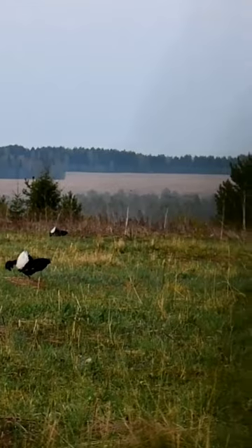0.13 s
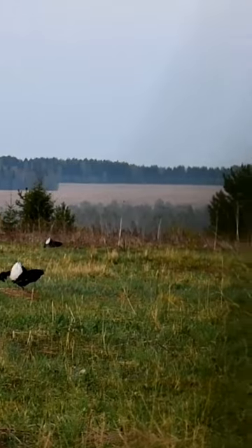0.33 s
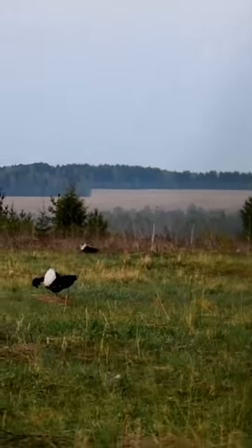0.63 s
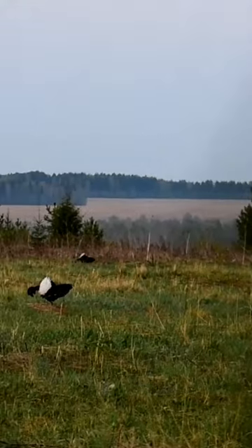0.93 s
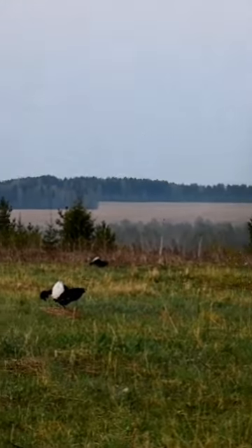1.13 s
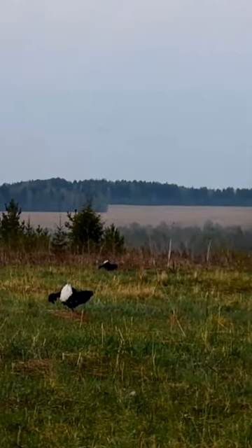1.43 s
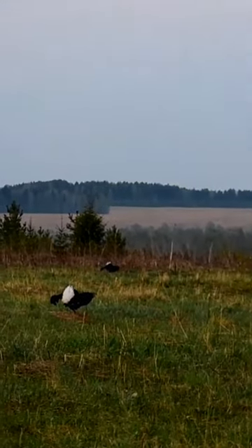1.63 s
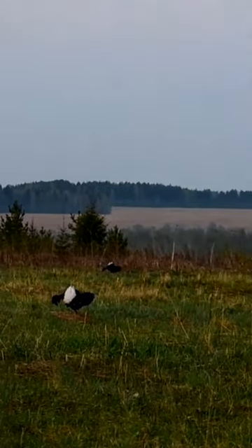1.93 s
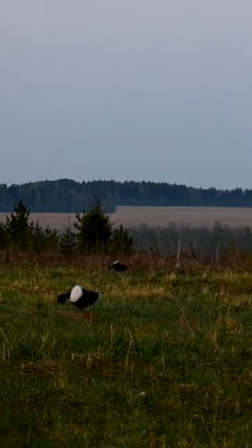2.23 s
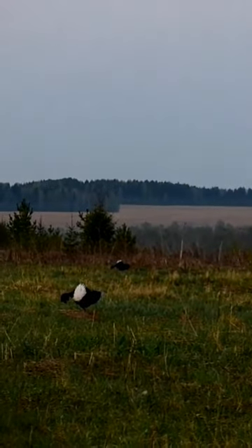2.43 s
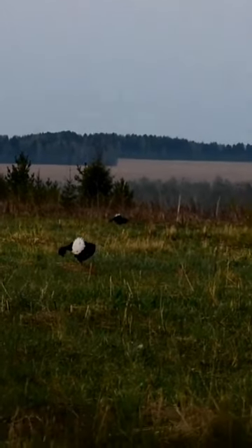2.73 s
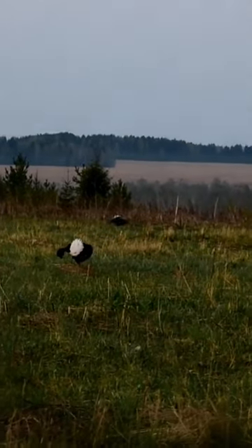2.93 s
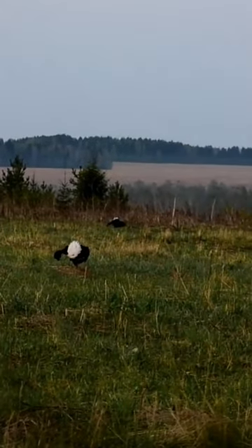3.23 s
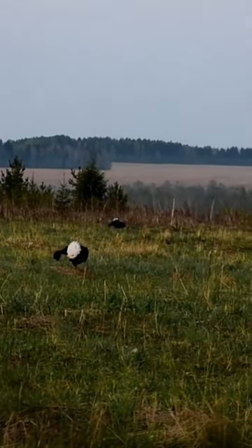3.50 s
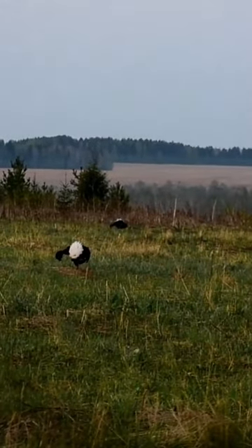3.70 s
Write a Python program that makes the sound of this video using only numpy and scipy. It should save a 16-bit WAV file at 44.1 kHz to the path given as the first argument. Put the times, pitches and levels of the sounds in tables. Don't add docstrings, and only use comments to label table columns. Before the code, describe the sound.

Bubbling black grouse calls across a field, ending in a raspy hiss, with larks whistling

```python
import sys
import numpy as np
from scipy import signal
from scipy.io import wavfile

SR = 44100
rng = np.random.default_rng(int(sys.argv[2]) if len(sys.argv) > 2 else 0)


def unload_audio(sound):
    columns = np.transpose(np.atleast_2d(sound))
    steps = np.round(np.clip(columns, -1, 1) * 32767)
    wavfile.write(sys.argv[1], SR, steps.astype(np.int16))


def boost(x):
    u = np.asarray(x, float) / 20
    return 10 ** u


N = 170226
T = np.arange(N) / SR


def rms_one(x):
    return x / np.sqrt(np.mean(x ** 2) + 1e-20)


def band_pass(x, order, low_hz, high_hz):
    return signal.sosfilt(signal.butter(order, [low_hz, high_hz], "band", fs=SR, output="sos"), x)


def coloured(x, points):
    hz, db = np.transpose(points)
    edges = np.minimum(20 * 2 ** np.arange(0, 10.1, .5), 17000)
    total = np.zeros(len(x))
    for k, (low, high) in enumerate(zip(edges, edges[1:])):
        gain = boost(np.interp(np.log(low * high) / 2, np.log(hz), db))
        total += gain * (-1) ** k * band_pass(x, 2, low, high)
    return rms_one(total)


def resonance(x, hz, width_hz):
    r = np.exp(-np.pi * width_hz / SR)
    poles = [1, -2 * r * np.cos(2 * np.pi * hz / SR), r * r]
    return signal.lfilter([(1 - r * r) / 2, 0, (r * r - 1) / 2], poles, x)


def resonance_twice(x, hz, width_hz):
    return resonance(resonance(x, hz, width_hz), hz, width_hz)


def drift(rate_hz):
    r = np.exp(-2 * np.pi * rate_hz / SR)
    slow = signal.lfilter([1], [1, -2 * r, r * r], rng.standard_normal(N + SR))
    return rms_one(slow[SR:])


def tone(pitch):
    return np.sin(2 * np.pi * np.cumsum(pitch) / SR + rng.uniform(0, 2 * np.pi))


def add_note(out, start_s, pitch, level_db, flat):
    i = int(start_s * SR)
    envelope = np.sin(np.linspace(0, np.pi, len(pitch))) ** (2 * flat)
    note = envelope * tone(pitch)
    out[i:i + len(pitch)] += boost(level_db) * note[:len(out) - i]


# f/Hz, density/dB
AIR_COLOUR = [(25, -11.5), (70, -3), (300, 0.5), (1000, -4.5), (3000, -5.5), (7000, -15), (12000, -18),
              (15500, -27)]
AIR_DB = -58


def air():
    return boost(AIR_DB + 1.06 * drift(0.82)) * coloured(rng.standard_normal(N), AIR_COLOUR)


# t/s, level/dB
HANDLING = [(.13, -55), (.7, -58), (1.3, -55), (1.7, -48.5), (1.88, -51.5), (1.96, -64), (2.5, -65),
            (2.62, -56.5), (2.8, -60.5), (2.95, -53.5), (3.1, -79)]
# f/Hz, density/dB
FABRIC_COLOUR = [(410, -61), (700, 6), (1210, -3), (2490, -5), (3300, 4), (5360, -6), (9600, -11.5),
                 (15500, -15)]
GRAINS_PER_S, GRAIN_SPREAD_DB, SMOOTH_SHARE = 1800, 4, 1.1
SHELL_HZ, SHELL_WIDTH_HZ = 3300, 500


def rustle():
    level_db = np.interp(T, *np.transpose(HANDLING))
    sizes = boost(GRAIN_SPREAD_DB * np.minimum(rng.exponential(1, N), 4)) * rng.choice([-1, 1], N)
    grains = sizes * (rng.random(N) < GRAINS_PER_S * boost(4 * drift(25)) / SR)
    dealt = rng.integers(0, 10, N)
    rings = np.zeros(N)
    for k, hz in enumerate(np.geomspace(1200, 11000, 10)):
        rings += resonance(grains * (dealt == k) + 1e-18, hz, .3 * hz)
    rub = rms_one(rings) + SMOOTH_SHARE * resonance(rng.standard_normal(N), 3400, 6400)
    on_shell = rub + 1.3 * resonance(rub, SHELL_HZ, SHELL_WIDTH_HZ)
    return boost(level_db) * coloured(on_shell, FABRIC_COLOUR)


# start t/s, length/s, from f/Hz, to f/Hz, peak level/dB
LARK_GLIDES = [(0.166, 0.036, 2120, 3080, -49), (0.404, 0.046, 4000, 3900, -42),
               (0.46, 0.037, 4500, 2605, -43), (0.566, 0.037, 6780, 6700, -48),
               (0.602, 0.036, 7180, 6280, -45.5), (0.613, 0.042, 6790, 6580, -44.5),
               (0.124, 0.031, 6000, 4940, -53.5), (0.57, 0.032, 4650, 4940, -52.5),
               (1.976, .065, 3050, 4230, -60), (2.168, 0.044, 3700, 3170, -55),
               (2.244, .16, 4000, 3140, -59), (2.422, 0.068, 4200, 3220, -60),
               (2.888, .05, 3700, 4140, -52), (2.946, .05, 4030, 3350, -52),
               (1.04, 0.024, 2790, 3270, -56.5), (2.993, 0.042, 3500, 2800, -51.5),
               (3.036, 0.049, 3070, 2570, -43.5), (3.095, 0.051, 2640, 2516, -45.5),
               (3.164, 0.084, 2457, 2442, -45), (3.292, 0.024, 2850, 2987, -50),
               (3.512, 0.027, 3410, 3380, -48), (3.722, 0.022, 7200, 4700, -54),
               (3.738, 0.018, 4800, 3810, -44.5)]
# start t/s, length/s, top f/Hz, place of top (0-1), peak level/dB
LARK_ARCHES = [
    (3.392, .073, 7050, .4, -55),
    (3.488, .067, 6750, .55, -55),
    (3.587, .069, 6900, .36, -55),
    (1.14, .1, 5600, .2, -60),
    (2.425, .04, 5300, .3, -58),
]
ARCH_RISE, ARCH_FALL, ARCH_LOW_GAIN_DB = .28, .42, 20
# start t/s, length/s, peak level/dB
LARK_TRILLS = [
    (0.269, 0.15, -56),
    (0.555, 0.18, -58),
    (0.919, 0.14, -57.5),
    (1.284, 0.13, -58),
    (1.639, 0.15, -60),
]
TRILL_HZ, TRILL_END_HZ, TRILL_WOBBLE_HZ, TRILL_PER_S = 5850, 4000, 200, 60
BUZZ_S, BUZZ_STEP_S, BUZZ_HZ, BUZZ_FALL_HZ, BUZZ_DB = 3.667, .0145, 6730, 588, -49.5
PHRASE_S, PHRASE_STEP_S = 2.022, .1205
PHRASE_HIGH_HZ, PHRASE_HIGH_DB, PHRASE_NOTE_HZ, PHRASE_NOTE_DB = 5900, -58.5, 4620, -55.5
CHORUS_HZ, CHORUS_SWING, CHORUS_DB = 4000, .16, -68


def lark_glides(out):
    waver_hz = 25 * drift(60)
    for s, length, from_hz, to_hz, db in LARK_GLIDES:
        n = int(length * SR)
        add_note(out, s, np.geomspace(from_hz, to_hz, n) + waver_hz[int(s * SR):][:n], db, flat=0.19)


def lark_arches(out):
    for s, length, top_hz, top_at, db in LARK_ARCHES:
        u = np.linspace(0, 1, int(length * SR)) - top_at
        rise = ARCH_RISE * (u / top_at) ** 2
        fall = ARCH_FALL * np.abs(u / (1 - top_at)) ** 1.5
        drop = np.where(u < 0, rise, fall)
        arch = np.zeros(N)
        add_note(arch, s, top_hz * (1 - drop), db, flat=0.035)
        drop_then = np.interp(T, s + np.linspace(0, length, len(drop)), drop)
        out += arch * boost(ARCH_LOW_GAIN_DB * drop_then - 2)


def lark_repeats(out):
    buzz_hz = BUZZ_HZ - np.linspace(0, BUZZ_FALL_HZ, int(0.0112 * SR))
    for k in range(4):
        add_note(out, BUZZ_S + k * BUZZ_STEP_S, buzz_hz, BUZZ_DB, flat=0.55)
    u = np.linspace(-1, 1, int(0.0288 * SR))
    for k in range(8):
        s = PHRASE_S + k * PHRASE_STEP_S
        sweep_hz = PHRASE_HIGH_HZ - 500 * u + 250 * drift(280)[:len(u)]
        add_note(out, s - .01, sweep_hz, PHRASE_HIGH_DB + rng.normal(0, 0.99), flat=0.4)
        add_note(out, s + 0.0095, PHRASE_NOTE_HZ - 70 * u, PHRASE_NOTE_DB + rng.normal(0, 1.5), flat=0.4)


def lark_trills(out):
    for s, length, db in LARK_TRILLS:
        u = np.linspace(0, 1, int(length * SR))
        fall_hz = (TRILL_HZ - TRILL_END_HZ) * np.clip((u - .6) / 0.34, 0, 1)
        wobble = np.sin(2 * np.pi * TRILL_PER_S * u * length) + 0.6 * drift(95)[:len(u)]
        add_note(out, s, TRILL_HZ - fall_hz + TRILL_WOBBLE_HZ * wobble, db, flat=0.052)


def lark_chorus(out):
    for bird in range(3):
        pitch = CHORUS_HZ * np.exp(CHORUS_SWING * drift(5.3))
        level_db = CHORUS_DB + 5 * np.clip(drift(9), -3, 1.2) + 4 * drift(200) - 4 * (T > 3)
        out += boost(level_db) * np.sin(2 * np.pi * np.cumsum(pitch) / SR)


def larks():
    out = np.zeros(N)
    for voice in (lark_glides, lark_arches, lark_repeats, lark_trills, lark_chorus):
        voice(out)
    echoes = sum(boost(db) * np.interp(T - lag_s, T, out)
                 for lag_s, db in ((.007, -16.5), (.019, -15), (.034, -17)))
    return (out + echoes) * boost(2.64 * drift(73))


# t/s, peak level/dB, ring f/Hz
SHELL_TICKS = [(.1628, -36.5, 2560), (.2331, -47, 9930), (0.2564, -42, 10200), (.2695, -40.5, 3400),
               (.29, -40, 12300), (.3214, -47, 10700), (.485, -41, 4500), (0.5147, -35.5, 3200),
               (.5519, -37, 3390), (0.6313, -38, 3800), (0.7661, -38.5, 3400), (1.187, -36, 3800),
               (1.37, -37, 3240), (1.3925, -41.5, 8300), (1.5315, -32.5, 3170), (1.55, -40.5, 1390),
               (1.5945, -37, 5500), (1.62, -33, 5100), (1.6599, -35, 4800), (1.7911, -43, 9200),
               (1.8097, -32, 3200), (1.8644, -47, 9580), (2.1089, -42.5, 3680), (2.297, -43, 9600),
               (2.5394, -41.5, 3600), (2.5717, -35, 3430), (3.786, -30.5, 1700)]
TICK_WIDTH_SHARE = 0.26


def ticks():
    out, n = np.zeros(N), int(.01 * SR)
    for s, db, hz in SHELL_TICKS:
        slip = rng.uniform(-1, 1, n) * np.exp(-np.arange(n) / SR / .0007)
        width_hz = TICK_WIDTH_SHARE * hz
        ring = resonance(resonance(slip, hz, width_hz), hz, 2 * width_hz)
        i = int(s * SR)
        out[i:i + n] += boost(db) * ring / np.abs(ring).max()
    return out


# note centre t/s, peak level/dB
ROLL_NOTES = [(.21, -47.5), (0.285, -50.5), (.358, -50), (0.435, -47), (.504, -48.5), (.58, -48),
              (.651, -47), (0.721, -49), (1.029, -47), (1.089, -52.5), (1.165, -55), (1.239, -49),
              (1.31, -50), (1.382, -48.5), (1.455, -49), (1.529, -47.5), (1.603, -45.5), (1.674, -50),
              (1.748, -46), (1.817, -43.5), (1.904, -42), (1.986, -42.5), (2.046, -44), (2.111, -51.5)]
ROLL_HZ, ROLL_RISE_FROM_S, ROLL_RISE_HZ_PER_S = 395.5, 1.34, 71
ROLL_NOTE_S, ROLL_FALL_HZ_PER_S, STEEPER_PER_HZ = 0.063, 3170, 29.5
# note centre t/s, f/Hz, glide/(Hz/s), peak level/dB
BUBBLE_NOTES = [(2.39, 508, -800, -41), (2.485, 470, -6500, -45.5), (2.567, 449, -4500, -45),
                (2.615, 467, -1500, -42), (2.653, 405, -300, -43), (2.692, 438, -4500, -43),
                (2.732, 407, -1500, -42.5), (2.77, 396.5, -4500, -48), (2.867, 440, -3000, -36.5),
                (2.968, 517, -1500, -46), (2.997, 514, -300, -45), (3.026, 424, -6500, -45),
                (3.052, 489, 300, -44.5), (3.088, 470, -3000, -48), (3.155, 540, -5500, -42.5),
                (3.224, 546, 1502, -45), (3.265, 484, -4500, -42), (3.306, 415, 1500, -45),
                (3.346, 433, -1500, -45.5), (3.411, 448, -3000, -40), (3.655, 444, -6500, -46),
                (3.79, 520, -1500, -52), (3.83, 519, 300, -50.5)]
# note centre t/s, f/Hz, peak level/dB
FAR_COOS = [(.47, 508, -53), (.585, 521, -51), (.66, 503, -54), (.76, 550, -55), (.85, 536, -58.5),
            (1.04, 510, -58), (1.085, 522, -56), (1.12, 509, -51), (1.262, 541, -46), (1.33, 523, -49.5),
            (1.45, 518, -58), (1.79, 555, -49), (2.345, 508, -58.5), (3.195, 484, -50.5),
            (3.61, 503.4, -59), (3.645, 535, -54)]
BUBBLE_NOTE_S, FAR_NOTE_S = 0.049, 0.033
LEK_DB, LEK_HZ, LEK_WIDTH_HZ = -66.5, 470, 102
ECHO_S, ECHO_DB = .031, -14.5


def grouse():
    roll = []
    for s, db in ROLL_NOTES:
        up_hz = ROLL_RISE_HZ_PER_S * max(s - ROLL_RISE_FROM_S, 0)
        roll.append((s, ROLL_HZ + up_hz, -ROLL_FALL_HZ_PER_S - STEEPER_PER_HZ * up_hz, db))
    far = [(s, hz, -600, db) for s, hz, db in FAR_COOS]
    out = np.zeros(N)
    for notes, length in ((roll, ROLL_NOTE_S), (BUBBLE_NOTES, BUBBLE_NOTE_S), (far, FAR_NOTE_S)):
        from_centre_s = np.arange(int(length * SR)) / SR - length / 2
        for s, hz, glide, db in notes:
            add_note(out, s - length / 2, hz + glide * from_centre_s, db, flat=1.0)
    out += boost(ECHO_DB) * np.interp(T - ECHO_S, T, out)
    lek = rms_one(resonance_twice(rng.standard_normal(N), LEK_HZ, LEK_WIDTH_HZ))
    return out * boost(2.3 * drift(36)) + boost(LEK_DB + 0.95 * drift(8)) * lek


# t/s, peak level/dB, ring f/Hz, scratch level/dB
SHELL_CREAKS = [(0.187, -32, 3280, -53), (0.2054, -28.5, 3280, -42.5), (0.3008, -44, 5300, -46.5),
                (0.5825, -41, 6800, -43.5), (0.8525, -30, 6000, -42), (0.8992, -38, 3640, -39.5),
                (0.9762, -26, 3270, -62), (1.1407, -30.5, 3400, -38.5), (1.3819, -32.5, 3320, -43.5),
                (1.489, -31.5, 3600, -81), (1.6387, -37, 3450, -65), (1.736, -32.5, 3820, -29),
                (1.9308, -25, 4070, -36), (2.0752, -37.5, 3870, -67), (2.1483, -34, 3400, -71),
                (2.2734, -37.5, 3840, -55), (2.412, -39.5, 4240, -43), (2.6203, -37.5, 3540, -37),
                (2.6948, -29.5, 3480, -37.5), (2.828, -37, 3300, -47), (2.8583, -33, 2800, -42)]
SLIPS_PER_S, CREAK_S, CREAK_WIDTH_HZ, LONG_RUB_S, LONG_RUB_AT_S = 5600, 0.0024, 1550, 0.0058, 1.736


def creaks():
    out, n = np.zeros(N + SR), int(.04 * SR)
    for s, db, hz, bright_db in SHELL_CREAKS:
        chance, size = rng.random((2, n))
        length = LONG_RUB_S if abs(s - LONG_RUB_AT_S) < .005 else CREAK_S
        cluster = np.exp(-(np.arange(n) / SR / length - .6) ** 2)
        slips = (chance < SLIPS_PER_S / SR) * (2 * size - 1) * cluster
        slips[5] = .6
        body = resonance_twice(slips, hz, CREAK_WIDTH_HZ) + 0.26 * resonance_twice(slips, 4680, 1800)
        scratch = resonance_twice(slips, 9500, 2700) + 0.27 * resonance(slips, 14100, 2700)
        scratch += size[0] * resonance_twice(slips, 7430, 700)
        i = int(s * SR)
        out[i:i + n] += boost(db) * body / np.abs(body).max()
        out[i:i + n] += boost(bright_db + 0.5) * scratch / np.abs(scratch).max()
    return out[:N]


# t/s, level/dB, throat f/Hz
BREATH = [(2.965, -56, 1510), (2.997, -46.5, 1540), (3.008, -37.5, 1490), (3.055, -40, 1420),
          (3.075, -42, 1334), (3.199, -51, 1128), (3.428, -46, 1346), (3.701, -40, 1408), (3.74, -43, 1398),
          (3.778, -40.5, 1438), (3.86, -39.5, 1630)]
# f/Hz, width/Hz, level/dB
MOUTH = [
    (3300, 830, -16),
    (4480, 780, -14),
    (5570, 810, -20.5),
]
THROAT_WIDTH_HZ, SKIRT_UP_HZ, CORE_WIDTH_HZ, CORE_DB, RASP_DB = 600, 170, 170, 10, 1.5
CORE_FOLLOWS, MOUTH_FOLLOWS = 0.55, 0.69
GAPE_S, GAPE_RISE_S, GAPE_DB, GAPE_LOW_HZ, GAPE_HIGH_HZ = 3.775, 0.023, -52, 1693, 7320


def throat_band(noise_pair, carrier, width_hz, up_hz):
    low_pass = signal.butter(3, width_hz / 2, fs=SR, output="sos")
    slow = signal.sosfilt(low_pass, noise_pair[0] + 1j * noise_pair[1])
    return rms_one(np.real(carrier * np.exp(2j * np.pi * up_hz * T) * slow))


def hiss():
    s, db, hz = np.transpose(BREATH)
    carrier = np.exp(2j * np.pi * np.cumsum(np.interp(T, s, hz)) / SR)
    effort_db = np.interp(T, s, db, left=-120)
    noise = rng.standard_normal((5, N))
    skirt = throat_band(noise[0:2], carrier, THROAT_WIDTH_HZ, SKIRT_UP_HZ)
    core = np.tanh(throat_band(noise[2:4], carrier, CORE_WIDTH_HZ, 0))
    core_gain = boost(CORE_DB + CORE_FOLLOWS * (effort_db + 44))
    throat = 0.33 * (skirt + core_gain * resonance(core, 1270, 1500))
    mouth = sum(boost(g_db) * rms_one(resonance_twice(noise[4], f, width)) for f, width, g_db in MOUTH)
    mouth = boost((MOUTH_FOLLOWS - 1) * (effort_db + 46.5)) * resonance(mouth, 4000, 4600)
    gape = rms_one(band_pass(noise[4, ::-1], 4, GAPE_LOW_HZ, GAPE_HIGH_HZ))
    opening = np.clip((T - GAPE_S) / GAPE_RISE_S, 0, 1)
    return boost(effort_db + RASP_DB * drift(70)) * (throat + mouth) + boost(GAPE_DB) * opening * gape


def scene():
    return (air() + rustle() + larks() + ticks() + grouse() + creaks() + hiss())[None]


def band_limit(x):
    return signal.sosfilt(signal.butter(12, 16480, fs=SR, output="sos"), x)


START_S, FADE_IN_S, CUTOFF_HZ = .129, 0.039, 15750


def record(dry):
    fade = (T > START_S) * np.clip(0.39 + (T - START_S) / FADE_IN_S, 0, 1)
    low_pass = signal.cheby2(12, 45, CUTOFF_HZ, fs=SR, output="sos")
    return band_limit(signal.sosfilt(low_pass, dry * fade))


dry = scene()
out = record(dry)
unload_audio(out)
```